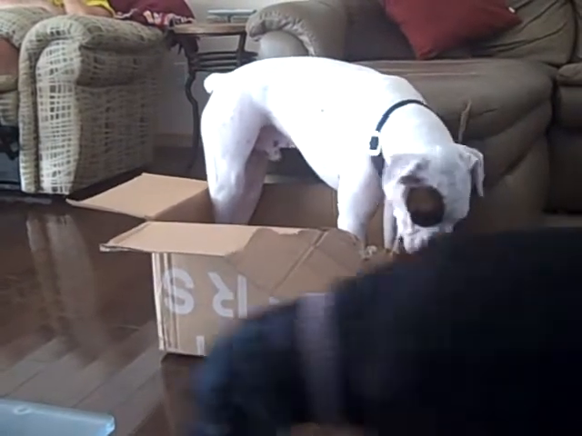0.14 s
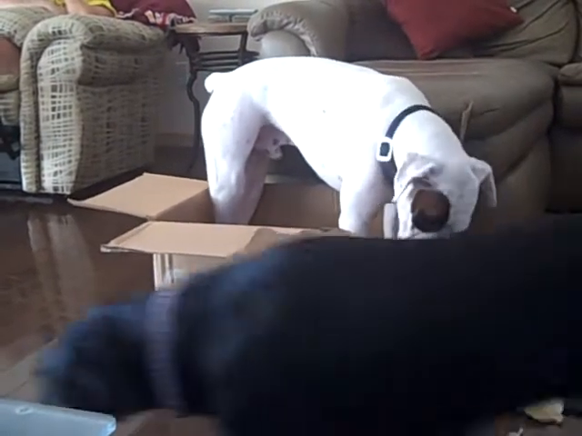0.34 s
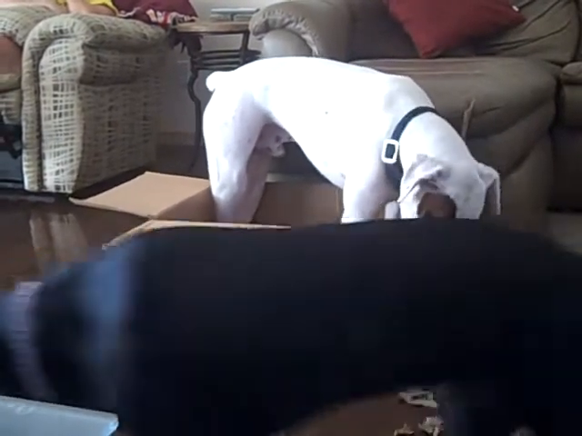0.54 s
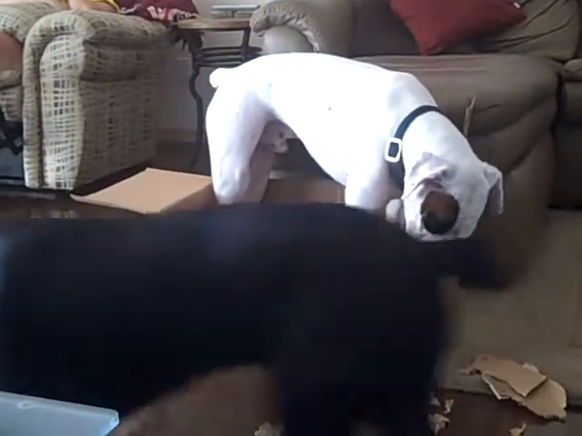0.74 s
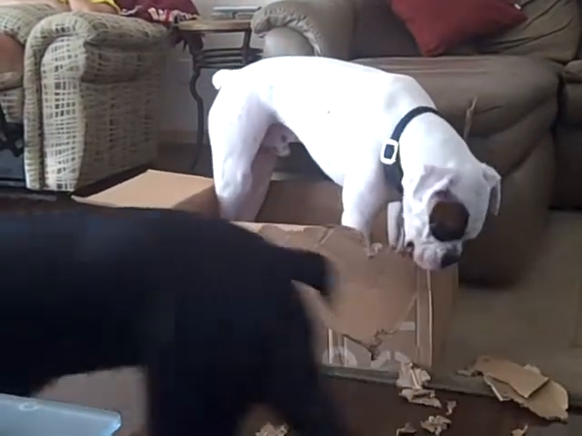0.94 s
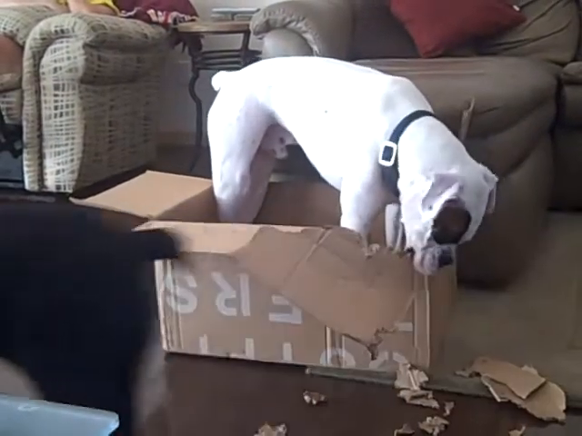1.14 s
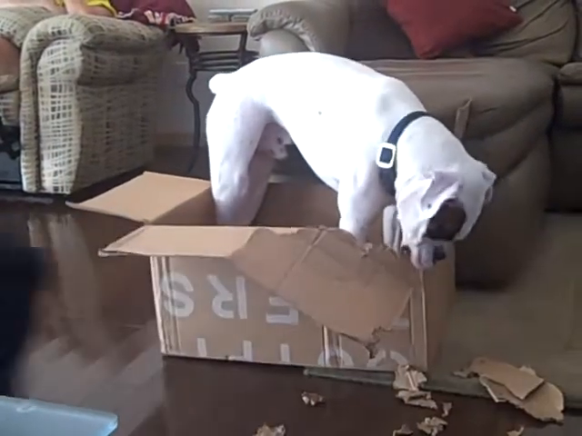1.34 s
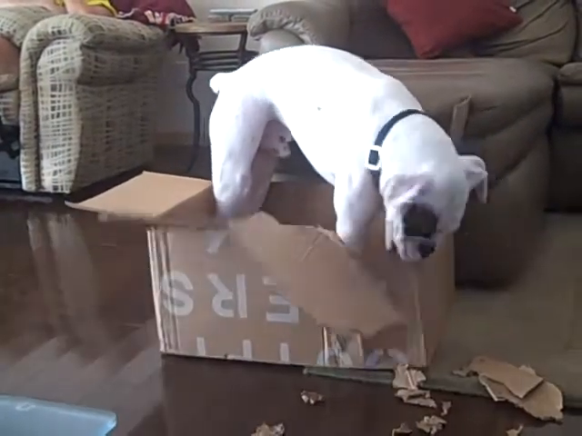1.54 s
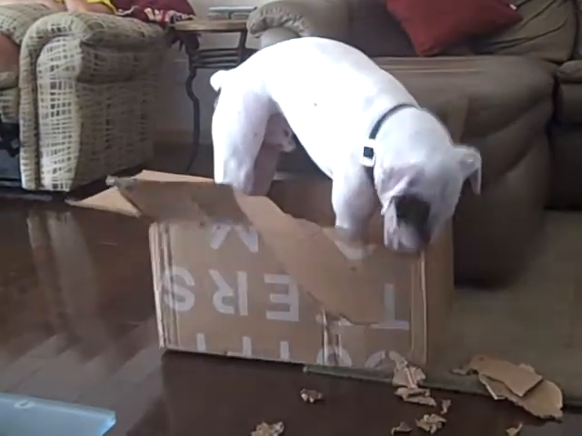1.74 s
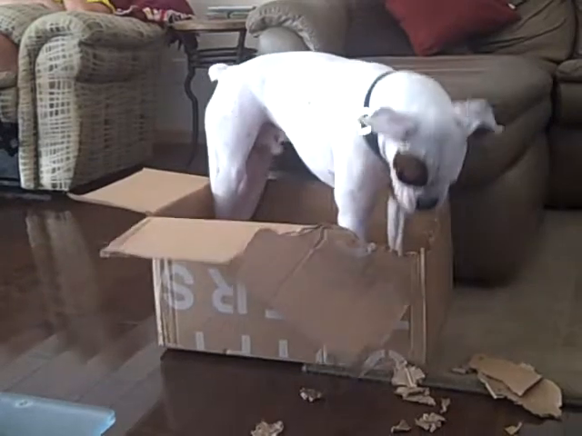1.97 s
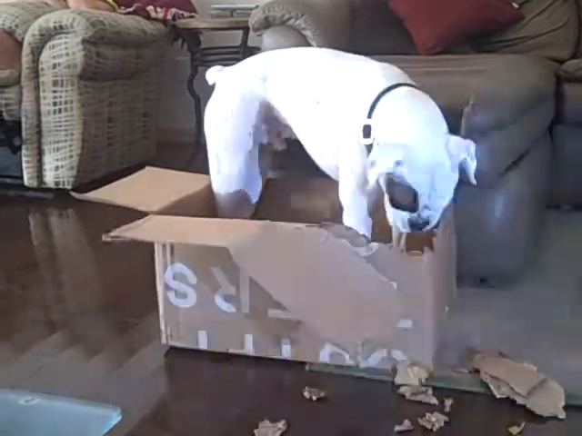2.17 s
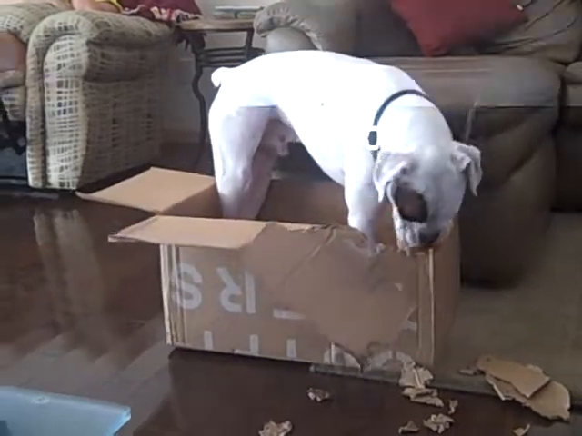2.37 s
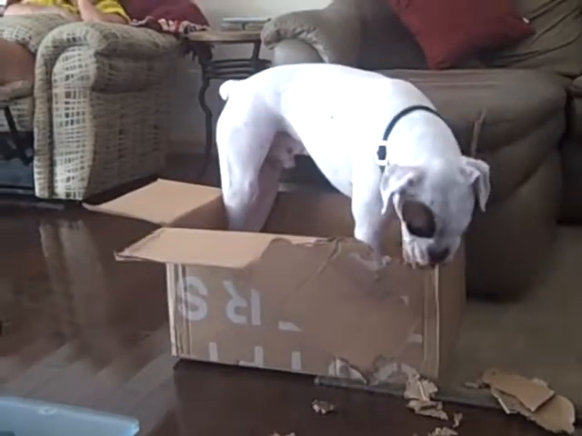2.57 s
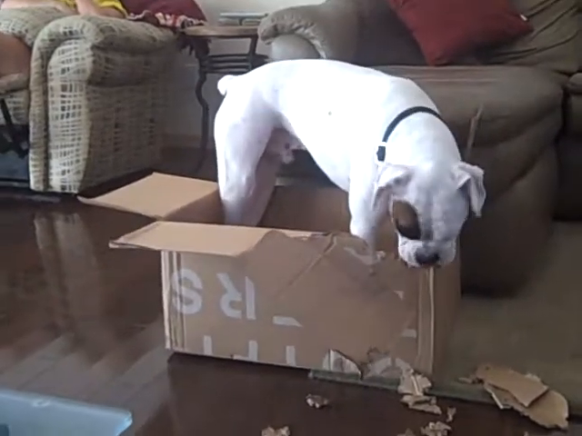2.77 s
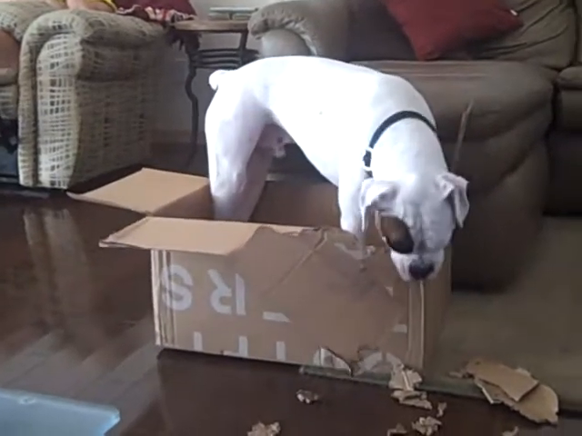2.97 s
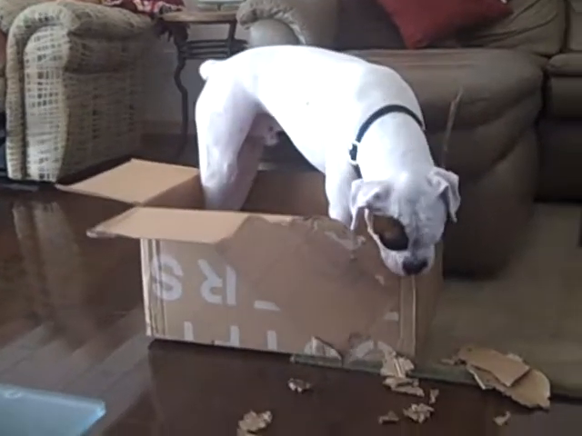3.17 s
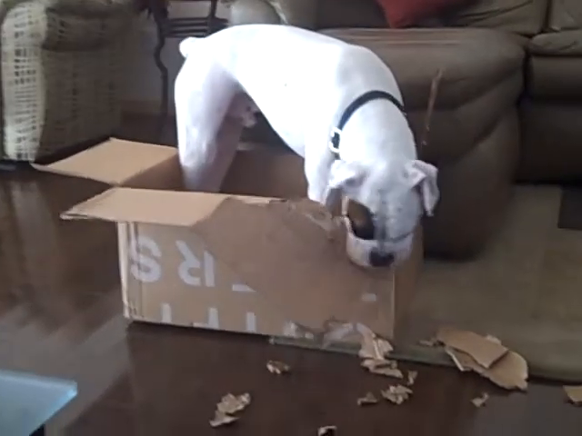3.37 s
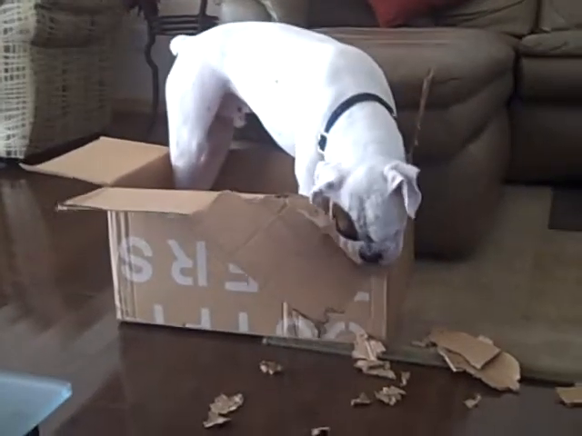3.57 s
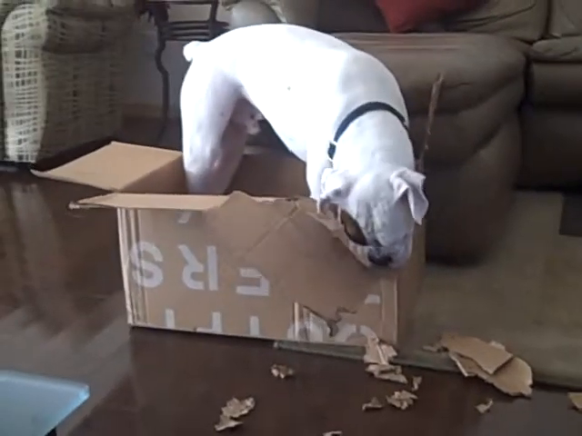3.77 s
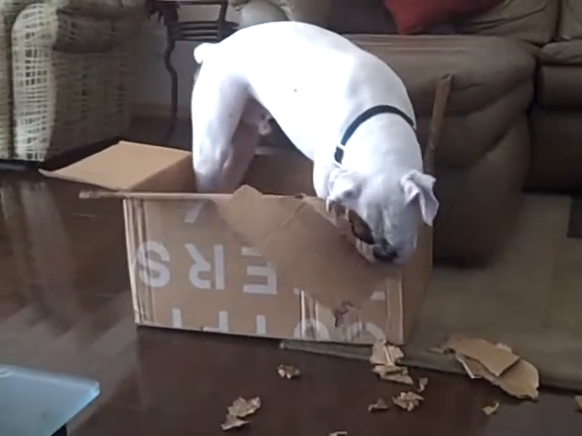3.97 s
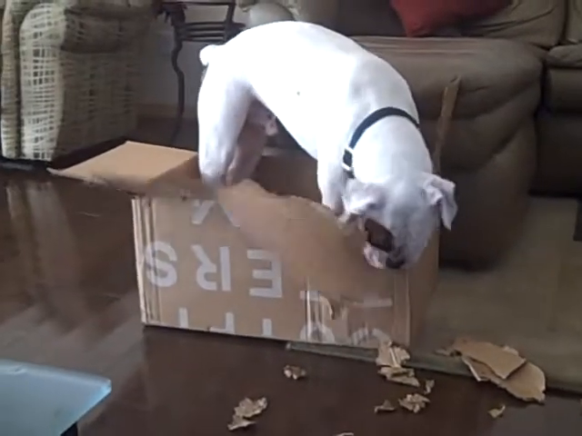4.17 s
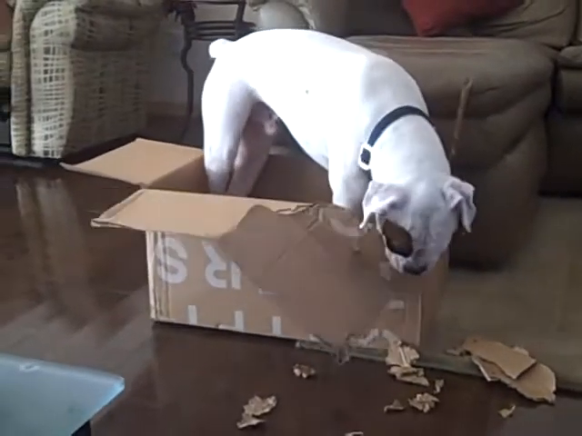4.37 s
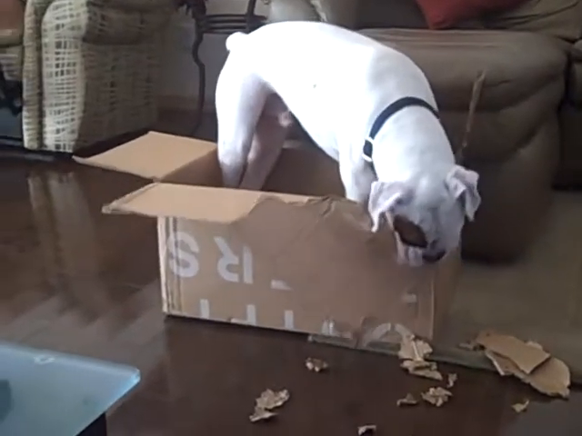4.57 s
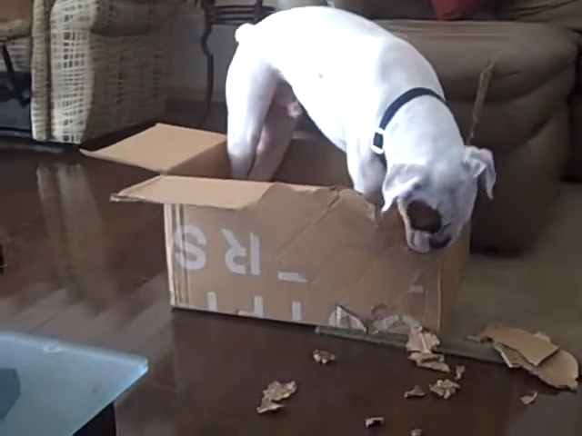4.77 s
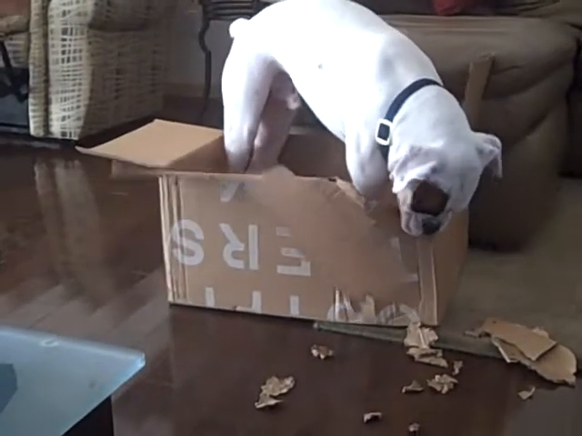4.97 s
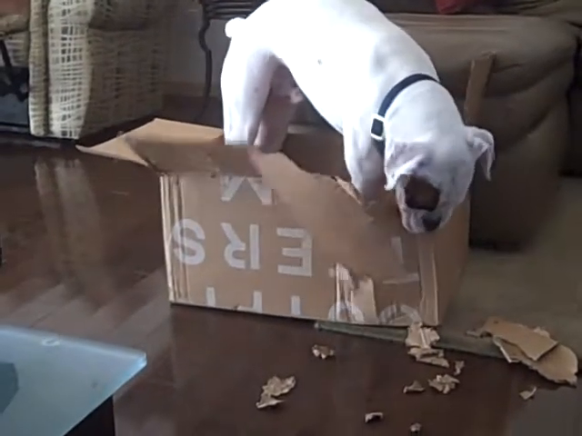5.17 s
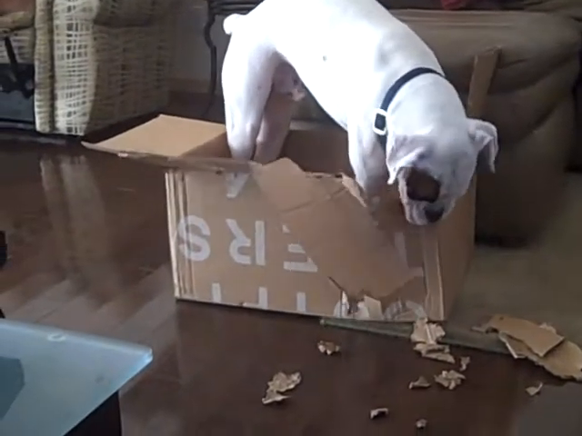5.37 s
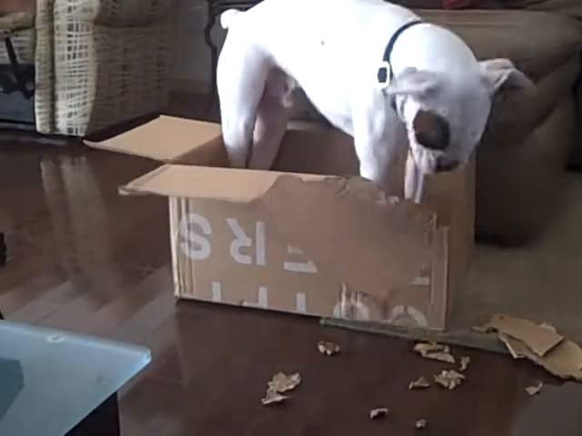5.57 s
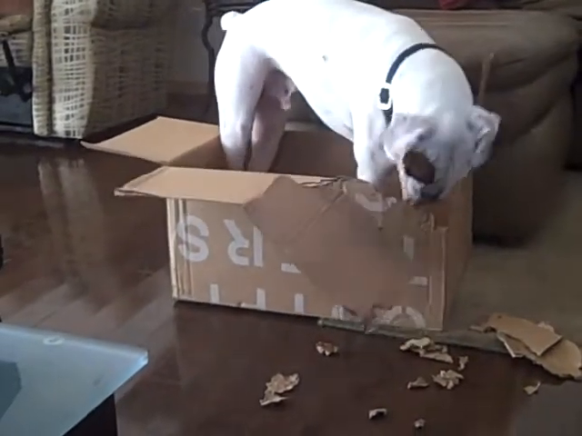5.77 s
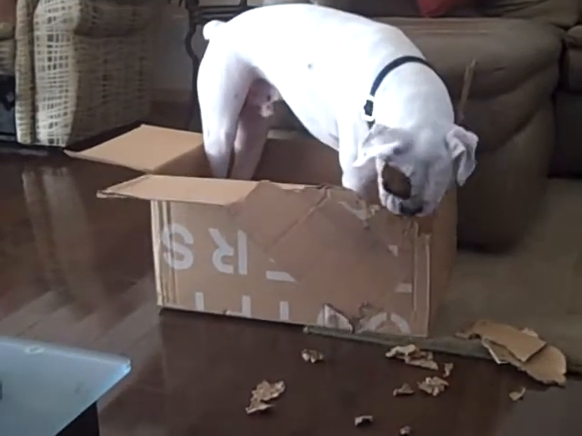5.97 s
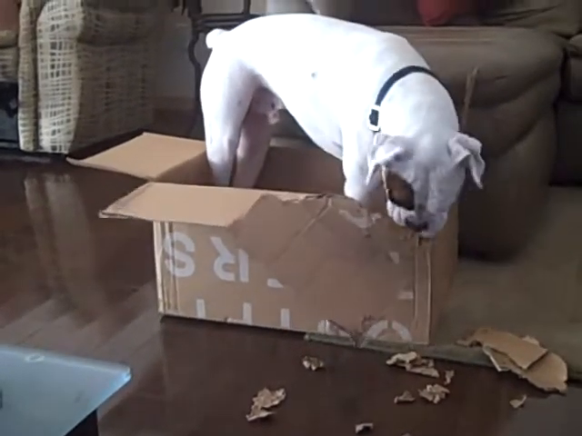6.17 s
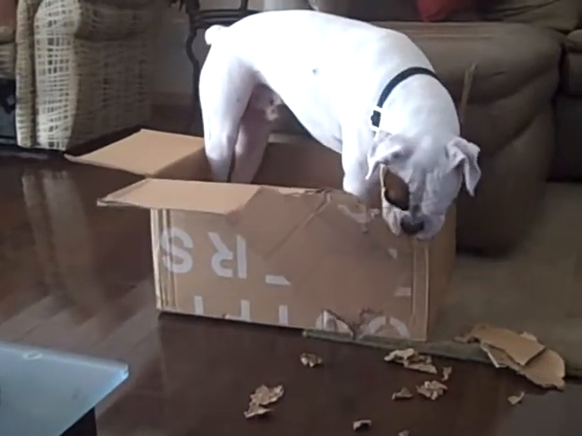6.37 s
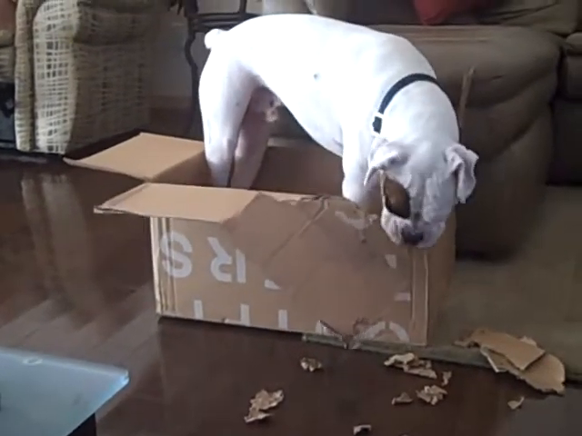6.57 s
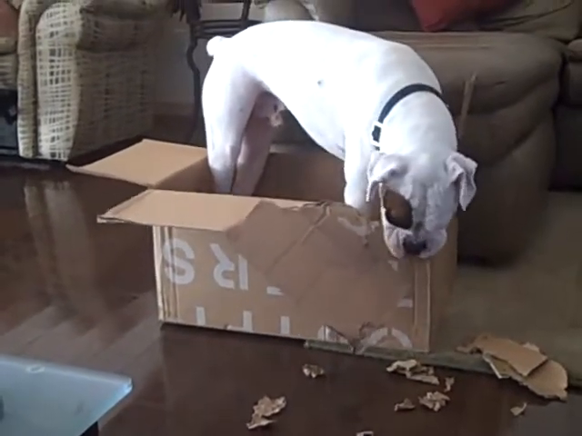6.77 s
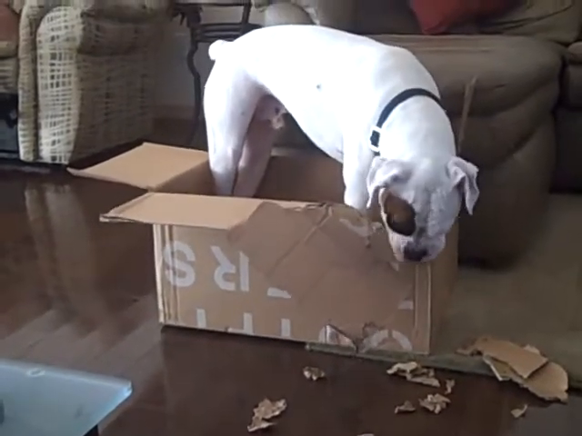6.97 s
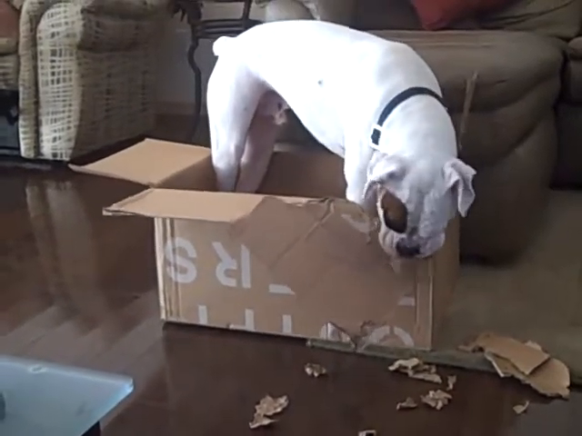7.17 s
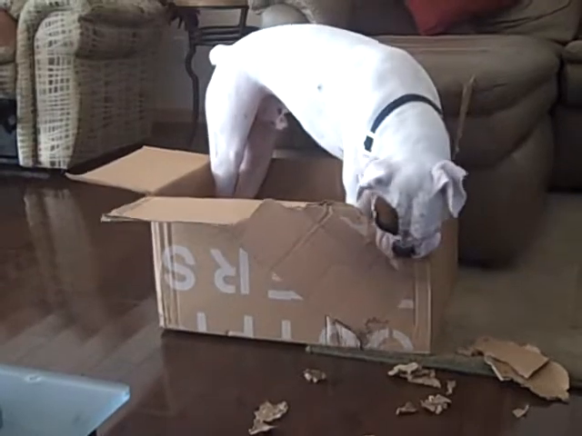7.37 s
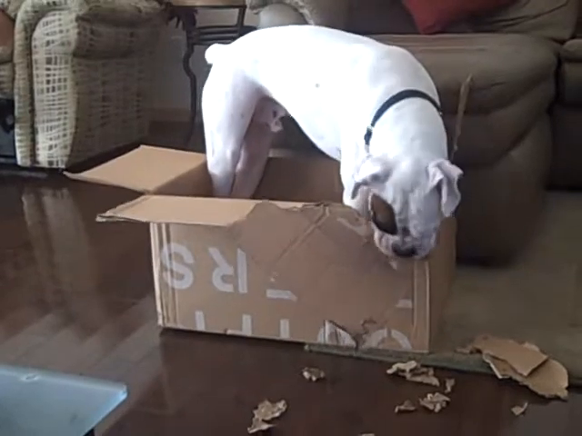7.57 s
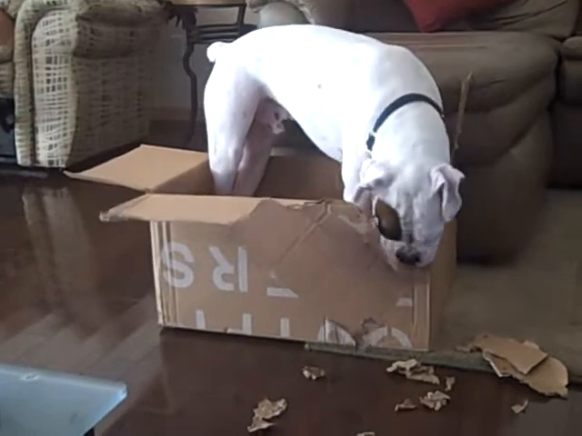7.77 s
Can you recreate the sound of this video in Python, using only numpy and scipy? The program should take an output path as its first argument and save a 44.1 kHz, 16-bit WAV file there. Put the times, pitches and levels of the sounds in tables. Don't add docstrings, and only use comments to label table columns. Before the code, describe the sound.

A dog gnaws and rips a cardboard box indoors, with sharp snaps, dry rustling, tooth clicks, short pants and one soft whimper.

```python
import sys
import numpy as np
from scipy import signal
from scipy.fft import rfft, irfft
from scipy.io import wavfile

SR = 44100
rng = np.random.default_rng(int(sys.argv[2]) if len(sys.argv) > 2 else 0)


def rack_gain(trim_db):
    fader = np.asarray(trim_db, float)
    return 10 ** (fader / 20)


def wav_out(sig):
    wavfile.write(sys.argv[1], SR, np.round(np.clip(np.atleast_2d(sig).T, -1, 1) * 32767).astype(np.int16))


N = 344641

# frequency in Hz, level in dB.
HUSH_SPECTRUM = [(12, -34), (20, 3.5), (70, -2.5), (301, -2), (513, 0.5), (718, -13), (1090, -4.5),
                 (2530, -14), (4540, -10), (12800, -24), (16000, -31)]
# frequency in Hz, rms level in dB.
ELECTRONICS = [(12166, -94), (12468, -86), (12769, -92), (13308, -90)]
# frequency in Hz, t60 in seconds.
ROOM_DECAY = [(100, 0.08), (400, 0.42), (1500, 0.4), (4000, 0.47), (12000, 0.24)]
GAIN_DROPS_S = [
    1.7685,
    5.4290,
]

# frequency in Hz, level in dB, t60 in seconds.
WALL_MODES = [(121.3, -8, 0.17), (159.2, -1.5, 0.17), (202.2, 2.5, 0.14), (247.2, 2.5, 0.11),
              (306, 0.4, 0.08), (424, -2, 0.096)]
# frequency in Hz, width in Hz, level in dB.
PANEL_MODES = [(647, 470, 10), (687, 110, 9), (1150, 270, 6), (1500, 770, 2), (1850, 126, 1.5),
               (2660, 520, -3), (3950, 1100, 5)]
# frequency in Hz, level in dB.
SCUFF_SPECTRUM = [(260, -78), (450, -20.5), (649, -13.5), (875, -10.5), (1730, -10), (2380, -8),
                  (4500, -26), (5850, -65), (9900, -120)]

# time in seconds, peak in dB.
PAW_PUSHES = [(0.415, -56), (0.71, -55), (2.68, -61), (3.535, -48), (4, -50), (6.7, -60), (5.185, -49),
              (3.24, -51), (4.628, -51), (5.1, -56), (5.465, -33), (5.565, -39.5), (7.225, -43),
              (6.821, -49), (1.8, -40)]
# start in seconds, length in seconds, starting pitch in Hz, sag in Hz per second,
# level in dB.
WHIMPER_SWELLS = [
    (6.94, 0.14, 430, 220, -56),
    (7.066, 0.059, 405, 60, -58),
    (7.159, 0.22, 412.5, 20, -58.5),
    (7.407, 0.08, 415, 5, -62.5),
]
# start in seconds, end in seconds, level in dB.
NOSE_BREATHS = [
    (2.95, 3.13, -67.5),
    (6.613, 7.003, -68),
]
# start in seconds, length in seconds, hiss at the teeth in dB,
# throat huff in dB.
PANTS = [
    (2.173, 0.25, -59.5, -62.5),
    (2.372, 0.12, -55.5, -61.5),
    (2.495, 0.3, -59, -53),
    (2.914, 0.11, -64, -65),
    (3.05, 0.12, -66, -67),
    (5.834, 0.15, -56.5, -58),
    (5.995, 0.33, -57.5, -64.5),
    (6.225, 0.16, -72, -49.5),
]
# time in seconds, pitch at the teeth in Hz, second throat resonance in Hz.
JAW_PATH = [(2.2, 5440, 1331), (2.33, 5640, 1420), (2.41, 5450, 1408), (2.49, 5370, 1560),
            (2.555, 6250, 1427), (2.62, 6330, 1382), (2.8, 6100, 1380), (2.93, 5620, 1590),
            (3.1, 5890, 1500), (5.84, 5270, 1487), (5.95, 5630, 1480), (6.02, 5650, 1400),
            (6.19, 5910, 1378), (6.25, 5705, 1400), (6.31, 5250, 1850), (6.38, 5240, 1746)]
# multiple of the second resonance, width in Hz, level in dB.
THROAT_BANDS = [(1, 170, 1), (1.75, 374, -2.3), (2.35, 500, -15)]
# multiple of the pitch at the teeth, width in Hz, level in dB.
GAP_BANDS = [(1, 400, 1), (1.25, 450, -7.5), (1.75, 500, -7.5), (2.25, 500, -7.5)]

# time in seconds, pressure of jaws and paws in dB, share tearing the paper skin in dB.
GNAWING = [(0.0, -54, -0.5), (0.41, -64.5, -1), (0.89, -55.5, -8), (1.07, -74, 8.5), (1.3, -60, 6.5),
           (1.5, -52.5, 5.5), (1.67, -55.5, -0.5), (2.3, -59, 3.5), (2.59, -59.5, -4), (3.0, -59.5, 0),
           (3.3, -56, -3.5), (4.02, -57, 6), (4.48, -58, -3), (4.85, -52, 2), (5.4, -52.5, -0.5),
           (6.2, -64, 3), (6.55, -57.5, -3.5), (7.81, -51.5, -7)]
# start in seconds, length in seconds, level in dB,
# pitch in Hz.
CREAKS_AND_WHISTLES = [(0.75, 0.11, -64, 3000), (1.12, 0.12, -55, 3700), (1.13, 0.15, -55.5, 1600),
                       (1.204, 0.061, -57, 4000), (1.208, 0.076, -60, 1150), (2.72, 0.12, -63.5, 2900),
                       (3.438, 0.03, -58, 1800), (4.386, 0.043, -49.5, 1330), (4.39, 0.032, -53, 2050),
                       (4.85, 0.02, -59, 6500), (6.15, 0.063, -64, 2800), (6.623, 0.067, -65, 10000),
                       (7.54, 0.016, -49, 750), (5.8, 0.06, -56, 3240), (6.3, 0.05, -52, 2500),
                       (2.53, 0.1, -56, 2500), (2.7, 0.03, -59.5, 930), (2.55, 0.056, -55.5, 640),
                       (6.64, 0.099, -66, 3200), (6.97, 0.058, -59, 2070), (4.62, 0.08, -51, 2700),
                       (2.4, 0.05, -66, 14700), (2.45, 0.03, -61, 9200), (2.51, 0.04, -64, 8700),
                       (2.64, 0.045, -64, 15000), (2.65, 0.03, -66, 10800), (5.7, 0.079, -61, 6100),
                       (5.72, 0.05, -69, 11700), (3.08, 0.05, -64, 6000), (7.62, 0.1, -50, 680),
                       (5.47, 0.05, -41, 1220), (1.77, 0.038, -38, 403), (7.72, 0.043, -49, 1760)]

# time in seconds, peak
# in dB, pitch in Hz.
HARD_CLICKS = [(2.225, -50, 8000), (2.267, -42, 6420), (2.392, -42, 7600), (2.411, -35, 5440),
               (2.557, -36.5, 6150), (2.743, -40, 5870), (2.933, -45, 5000), (3.2308, -35.5, 1750),
               (3.344, -45.5, 615), (4.191, -33.5, 1500), (4.5363, -32.5, 1370), (5.7117, -30, 1200),
               (5.838, -36.5, 5350), (6.257, -36, 3270), (6.378, -49, 8000), (6.468, -45.5, 2400),
               (7.0807, -43, 1950),
               (0.1307, -46, 2860), (0.3253, -55, 1810), (0.468, -41.5, 3850), (0.485, -45, 1530),
               (2.1756, -48, 1230), (2.4335, -45.5, 1440), (2.5133, -46, 1740), (3.3673, -50, 2580),
               (3.4531, -43, 1830), (3.734, -44, 1340), (3.7964, -48, 1440), (4.3307, -45, 1980),
               (4.4053, -38, 1240), (4.5676, -35, 1920), (5.0031, -40, 1890), (5.057, -42, 2100),
               (5.1866, -36, 1380), (7.576, -25.5, 2284),
               (0.5867, -62, 710), (0.6311, -55, 624), (0.6964, -49, 730), (1.087, -37, 1130),
                (1.2786, -55, 1100), (1.9321, -40.5, 710), (2.8615, -54, 650), (3.0351, -41.5, 645),
                (3.2326, -44.5, 650), (3.9839, -49, 680), (4.6439, -33, 810), (6.7462, -47.5, 690),
                (7.5588, -20.5, 670),
               (0.1297, -47, 7410), (0.3248, -50, 4910), (0.3896, -49, 6910), (0.5353, -56, 7110),
               (0.7533, -39, 4570), (0.9798, -54, 13700), (1.6857, -50, 13370), (2.4205, -43, 5580),
               (2.4724, -43, 5340), (2.7223, -47, 6350), (3.2252, -49, 14100), (3.6587, -43, 12940),
               (4.331, -47, 4690), (4.7417, -50, 13740), (4.8934, -42, 8960), (4.9487, -41, 10210),
               (5.0051, -38, 10640), (5.4371, -22, 9780), (5.6437, -46, 9300), (5.7105, -40, 9910),
               (6.5381, -51, 4970), (6.5845, -47, 5150), (7.1048, -52, 6400), (7.5577, -27.5, 5200)]
# time in seconds, peak in dB.
FIBRE_TICKS = [(0.066, -41), (0.0833, -35), (0.389, -49), (0.465, -40.5), (0.7787, -33.5), (1.0839, -24),
               (1.132, -33.5), (1.2161, -32.5), (1.44, -36), (1.7662, -11.5), (1.852, -28), (2.545, -43),
               (2.4576, -39), (2.5137, -41), (2.597, -35.5), (2.6374, -44), (0.898, -43.5), (3.4762, -25.5),
               (3.6542, -42), (4.191, -34.5), (4.5928, -28), (4.7104, -36), (5.3616, -40), (5.5169, -45),
               (6.195, -45), (6.7144, -42), (7.1724, -43), (7.194, -26.5), (7.5568, -28), (7.7952, -24.5)]
# time in seconds, peak in dB, t60 in seconds.
SKIN_SCRAPES = [(0.7348, -34, 0.028), (1.358, -42, 0.068), (1.406, -49, 0.026), (1.504, -34.5, 0.034),
                (1.7303, -34, 0.038), (1.7407, -30, 0.087), (3.698, -35.5, 0.042), (3.7304, -39, 0.031),
                (3.9524, -36.5, 0.099), (4.03, -40, 0.057), (4.085, -45, 0.028), (4.779, -30.5, 0.029),
                (4.826, -35.5, 0.022), (4.861, -36, 0.039), (4.9487, -47, 0.039), (4.983, -38, 0.061),
                (5.0549, -40, 0.029), (5.0812, -37, 0.066), (5.149, -34, 0.2), (5.172, -28, 0.051),
                (5.3785, -40, 0.042), (5.417, -29, 0.062), (5.427, -22, 0.046), (5.712, -39.5, 0.063),
                (6.644, -43, 0.091), (2.665, -46, 0.05), (6.8018, -32, 0.027), (7.3103, -39.5, 0.1)]

# time in seconds, peak in dB, pitch of the piece in Hz,
# wall thump in dB, share sent to the room in dB.
RIM_BITES = [(0.337, -47, 730, -55, 7), (0.628, -44.5, 635, -54, 7.5), (0.735, -27, 2700, -55, 2),
             (0.857, -36.5, 765, -50.5, 3.2), (1.023, -40, 1086, -51, 7), (1.085, -29.5, 1680, -46, 6.5),
             (1.778, -17, 653, -24, 1.5), (3.034, -40.5, 644, -46.5, 0), (3.229, -44, 1920, -49.5, -15),
             (3.343, -43.5, 636, -49, -13), (3.4764, -20.5, 695, -38.5, -5.5), (4.377, -40, 644, -52, 7),
             (4.536, -31.5, 650, -45.5, 1), (4.593, -17, 1700, -39.5, -5.5), (4.614, -19, 1500, -43.5, -6),
             (4.781, -28, 1950, -45.5, 3), (5.077, -43, 750, -50.5, 5.5), (5.509, -27, 1261, -34, -1.5),
             (6.534, -50, 610, -49.5, 5.5), (7.08, -32, 720, -46.5, -3), (7.197, -23.5, 675, -39, -1),
             (7.557, -25, 716, -43, 4.5), (7.574, -26.5, 1080, -43, -10), (7.763, -29.5, 623, -42.5, -1)]
# time in seconds, peak in dB, pitch of the piece in Hz,
# wall thump in dB, share sent to the room in dB.
BOARD_RIPS = [(0.083, -53.5, 810, -82, 17.5), (0.693, -50, 3000, -57, 9), (1.217, -44, 1150, -64, 10),
              (1.469, -43, 1520, -54.5, 13), (1.742, -25, 1780, -37, 2.5), (1.767, -19, 1070, -45, -1.5),
              (2.175, -51, 1180, -78, 3), (2.494, -47, 966, -79, 11), (3.508, -30.5, 1050, -47, 4.5),
              (3.697, -40.5, 703, -61.5, 1), (3.787, -46, 1950, -69, 0), (4.031, -48, 1450, -64, 2),
              (4.19, -33, 714, -51, 1), (4.984, -38.5, 770, -52.5, 6), (5.174, -36.5, 650, -49.5, 9),
              (5.428, -14.5, 663, -28, 0.5), (5.745, -49, 1297, -63, -13), (5.895, -44.5, 1445, -69, 7),
              (6.194, -41, 2640, -54.5, 4), (6.695, -50, 800, -57, 7), (6.802, -31.5, 590, -44, -0.5),
              (7.158, -38.5, 2040, -52.5, 7.5), (7.312, -38.5, 746, -55, 0.5), (7.797, -30, 1150, -43, 7.5)]
# time in seconds, peak in dB, pitch in Hz, share sent to the room in dB.
EDGE_NIBBLES = [(0.404, -42, 2350, 6), (0.426, -55, 1190, 13), (0.466, -50, 1000, 11),
                (2.987, -44.5, 2117, 5.5), (3.413, -42, 644, 2.5), (3.441, -38.5, 1800, 1),
                (4.396, -39.5, 1300, 3), (4.415, -38, 1150, -4), (0.155, -44.5, 1700, 4),
                (3.478, -23.5, 1770, -4), (4.5943, -27, 2250, -3), (5.43, -21, 1400, 1),
                (1.6, -41, 2500, -11), (4.567, -66, 1900, -7), (6.466, -61, 2310, 2.1),
                (6.566, -41.5, 720, -7), (6.586, -41.5, 2250, 1)]

HUSH_DB = -67.5
BITE_CRACK_DB, RIP_CRACK_DB, NIBBLE_CRACK_DB, NIBBLE_THUMP_DB = -31, -4, -40, -33
CRACK_GROWTH_DB_PER_DB, MIDDLING_DB = 0.94, -35
SETTLE_DB, SETTLE_RISE_S, SETTLE_FALL_S = -28, 0.037, 0.059


def rms_one(x):
    return x / np.sqrt(np.mean(x ** 2) + 1e-20)


def peak_one(x):
    return x / np.max(np.abs(x))


def impulse(size):
    return 1.0 * (np.arange(size) == 0)


def in_time(rows):
    s, *columns = np.transpose(rows)
    return [np.interp(np.arange(N) / SR, s, column) for column in columns]


def swell(start_s, length_s, peak=0.52):
    out = np.zeros(N)
    part = np.linspace(0, 1, round(length_s * SR))
    bend = np.log(0.5) / np.log(np.clip(peak, 0.1, 0.9))
    out[round(start_s * SR):][:len(part)] = np.abs(np.sin(np.pi * part ** bend))
    return out


def shaped(x, points):
    hz, db = np.transpose(points)
    freqs_hz = np.fft.rfftfreq(len(x), 1 / SR) + 1
    return irfft(rfft(x) * rack_gain(np.interp(np.log(freqs_hz), np.log(hz), db)), len(x))


def band(x, low_hz, high_hz):
    sos = signal.butter(2, [low_hz, min(high_hz, 19000)], "band", fs=SR, output="sos")
    return signal.sosfilt(sos, x)


def resonance(x, hz, width_hz):
    r = np.exp(-np.pi * width_hz / SR)
    poles = [1, -2 * r * np.cos(2 * np.pi * hz / SR), r * r]
    return signal.lfilter([(1 - r * r) / 2, 0, (r * r - 1) / 2], poles, x)


def moving_band(hz, width_hz):
    r = np.exp(-2 * np.pi * width_hz / SR)
    slow = signal.lfilter([1], [1, -2 * r, r * r], rng.standard_normal((2, N)))
    phase = 2 * np.pi * np.cumsum(hz) / SR
    return rms_one(slow[0] * np.sin(phase) + slow[1] * np.cos(phase))


def grains(per_s, spread_db, clump_db):
    clumps = rms_one(signal.lfilter([1], [1, -1.98, 0.9801], rng.standard_normal(N)))
    born = rng.random(N) < per_s * rack_gain(clump_db * clumps) / SR
    size = rack_gain(spread_db * np.minimum(rng.exponential(1, N), 5))
    return born * size * rng.choice([-1, 1], N)


def hush():
    return rack_gain(HUSH_DB) * rms_one(shaped(rng.standard_normal(N), HUSH_SPECTRUM))


def electronics():
    t = np.arange(N) / SR
    return sum(np.sqrt(2) * rack_gain(db) * np.sin(2 * np.pi * hz * t) for hz, db in ELECTRONICS)


def living_room(x):
    t = np.arange(SR) / SR
    hz, t60_s = np.transpose(ROOM_DECAY)
    edges_hz = 60 * 2 ** np.arange(0, 8.6, 0.5)
    echo = np.zeros(SR)
    for low, high in zip(edges_hz, edges_hz[1:]):
        decay_s = np.interp(np.log(low * high) / 2, np.log(hz), t60_s)
        echo += band(rng.standard_normal(SR), low, high) * rack_gain(-60 * t / decay_s)
    echo *= np.clip((t - 0.007) / 0.008, 0, 1)
    return signal.fftconvolve(x, echo / np.sqrt(np.sum(echo ** 2)))[:N]


def walls(push):
    return sum(rack_gain(db) * (-1) ** k * resonance(push, hz, np.log(1000) / np.pi / t60_s)
               for k, (hz, db, t60_s) in enumerate(WALL_MODES))


def panel(x):
    return x + sum(rack_gain(db) * resonance(x, hz, width_hz) for hz, width_hz, db in PANEL_MODES)


def paws():
    push_n = round(0.0051 * SR)
    push = np.zeros(8192)
    push[:push_n] = np.hanning(push_n)
    boom = peak_one(walls(np.gradient(push)))
    out = np.zeros(N)
    for s, db in PAW_PUSHES:
        out[round(s * SR):][:len(boom)] += rack_gain(db) * boom
    return out


def whimper():
    waver_hz, quaver_db = 4.0, 2
    t = np.arange(N) / SR
    tremble = rms_one(band(rng.standard_normal(N), 6.0, 23.0))
    waver = waver_hz * np.cumsum(tremble) / SR
    out = np.zeros(N)
    for s, length_s, hz, sag_hz_per_s, db in WHIMPER_SWELLS:
        cycles = (hz - sag_hz_per_s * (t - s) / 2) * (t - s) + waver
        level = np.sqrt(2) * rack_gain(db) * swell(s, length_s, 0.49) ** 1.1
        out += level * np.sin(2 * np.pi * cycles)
    return rack_gain(quaver_db * tremble) * out


def sniffs():
    t = np.arange(N) / SR
    level = sum(rack_gain(db) * np.clip(np.minimum(t - start, end - t) / 0.018, 0, 1)
                for start, end, db in NOSE_BREATHS)
    return level * moving_band(np.full(N, 3450.0), 340)


def teeth_hiss(hiss_hz):
    attack_s, fade_db, air_db = 0.0065, -5.5, -6
    t = np.arange(N) / SR
    level = np.zeros(N)
    for s, length_s, db, _ in PANTS:
        gate = np.clip(np.minimum(t - s, s + length_s - t) / attack_s, 0, 1)
        level += rack_gain(db + fade_db * np.clip((t - s) / length_s, 0, 1)) * gate
    hiss = sum(rack_gain(db) * moving_band(ratio * hiss_hz, width_hz) for ratio, width_hz, db in GAP_BANDS)
    hiss = hiss + rack_gain(air_db) * rms_one(band(rng.standard_normal(N), 4700, 16000))
    return rack_gain(-6.5) * level * hiss


def throat_huff(throat_hz):
    rasp_db = 3.5
    level = sum(rack_gain(db) * swell(s, length_s, 0.35) for s, length_s, _, db in PANTS)
    huff = sum(rack_gain(db) * moving_band(ratio * throat_hz, width_hz) for ratio, width_hz, db in THROAT_BANDS)
    huff = huff + moving_band(np.full(N, 740.0), 150)
    huff = huff + rack_gain(rasp_db) * rms_one(band(grains(2500.0, 3.0, 4.0), 770, 5300))
    return rack_gain(-7.0) * level * huff


def panting():
    hiss_hz, throat_hz = in_time(JAW_PATH)
    breath = throat_huff(throat_hz) + teeth_hiss(hiss_hz) + sniffs()
    puffs = rms_one(band(rng.standard_normal(N), 14.0, 51))
    return breath * rack_gain(1.8 * puffs)


def settling(column):
    power = np.full(N, 1e-18)
    for row in all_snaps():
        power[round(row[0] * SR)] += rack_gain(2 * row[column])
    slow = np.exp(-1 / SETTLE_FALL_S / SR)
    fast = np.exp(-(1 / SETTLE_FALL_S + 1 / SETTLE_RISE_S) / SR)
    return np.sqrt(signal.lfilter([0, slow - fast], np.convolve([1, -slow], [1, -fast]), power))


def patchy(x):
    depth_db = 2.1
    edges_hz = 1960 * 2 ** np.arange(0, 3.1, 0.5)
    hiss = band(x, 1850, 15800)
    out = hiss
    for k, (low, high) in enumerate(zip(edges_hz, edges_hz[1:])):
        pace = rms_one(band(np.roll(x, k * SR), 2.6, 22.0))
        out = out + (rack_gain(depth_db * np.tanh(pace / 2) * 2) - 1) * band(hiss, low, high)
    return rms_one(out)


def rustle():
    press_db, tear_db = in_time(GNAWING)
    after = rack_gain(SETTLE_DB) * settling(column=1)
    after_thump = rack_gain(-22) * settling(column=3)
    after_crack = rack_gain(-27.5) * settling(column=4)
    rub = grains(1500.0, 1.46, 5.0)
    rumble = np.hypot(rack_gain(-78.0), after_thump) * rms_one(walls(rub))
    scuff = np.hypot(rack_gain(press_db - 5.5), after) * rms_one(panel(shaped(rub, SCUFF_SPECTRUM)))
    hiss_level = np.hypot(rack_gain(press_db + tear_db - 7.5), rack_gain(-18) * after + after_crack)
    hiss = hiss_level * patchy(rub + grains(6000.0, 2.5, 3.9))
    lone = band(grains(250.0, 5.5, 5.0), 730, 8500)
    crackle = rack_gain(-7.5) * after * rms_one(panel(lone))
    return rumble + scuff + hiss + crackle


def creaks_and_whistles():
    width = 0.26
    rub = rms_one(grains(3000.0, 1.8, 3.3))
    out = np.zeros(N)
    for s, length_s, db, hz in CREAKS_AND_WHISTLES:
        part = slice(round(s * SR), round((s + length_s) * SR))
        ringing = resonance(resonance(rub[part], hz, width * hz), hz, 2 * width * hz)
        out[part] += rack_gain(db) * rms_one(ringing) * swell(s, length_s)[part]
    return out


def prickle():
    press_db, tear_db = in_time(GNAWING)
    return rack_gain(-20 + press_db + tear_db) * rms_one(band(grains(220.0, 3.5, 5.0), 3300, 14500))


def teeth():
    size = 1024
    click = impulse(size)
    edge = rack_gain(-12) * peak_one(band(click, 1500, 14000))
    out = np.zeros(N + size)
    for s, db, hz in HARD_CLICKS:
        ring = peak_one(resonance(resonance(click, hz, 0.14 * hz), hz, 0.79 * hz))
        body = rack_gain(-8.5) * peak_one(band(click, max(0.25 * hz, 480), hz))
        hit = rack_gain(-1.5) * ring + body + edge * min(hz / 1200, 1) ** 2
        out[round(s * SR):][:size] += rack_gain(db) * hit
    return out[:N]


def ticks():
    size, fibre_hz, fibre_t60_s, skin_hz = 4096, 4230, 0.032, 11400
    t = np.arange(size) / SR
    rows = [(s, db, fibre_hz, fibre_t60_s) for s, db in FIBRE_TICKS]
    rows += [(s, db, skin_hz, t60_s) for s, db, t60_s in SKIN_SCRAPES]
    out = np.zeros(N + size)
    for s, db, hz, t60_s in rows:
        noise = rng.standard_normal(size)
        fade = rack_gain(-60 * t / t60_s) * np.minimum(t / t60_s / 0.22, 1)
        middle = np.argmax(fade) // 2
        fade[middle] = 2.4 / abs(noise[middle])
        burst = noise * fade
        puff = peak_one(resonance(burst, hz, 0.5 * hz)) + 2.82 * peak_one(band(burst, 1800, 23700))
        out[round(s * SR):][:size] += rack_gain(db - 9.5) * puff
    return out[:N]


def all_snaps():
    def crack(db, share_db):
        return MIDDLING_DB + CRACK_GROWTH_DB_PER_DB * (db - MIDDLING_DB) + share_db
    bites = [(s, db, hz, thump_db, crack(db, BITE_CRACK_DB), room_db)
             for s, db, hz, thump_db, room_db in RIM_BITES]
    rips = [(s, db, hz, thump_db, crack(db, RIP_CRACK_DB), room_db)
            for s, db, hz, thump_db, room_db in BOARD_RIPS]
    nibbles = [(s, db, hz, db + NIBBLE_THUMP_DB, crack(db, NIBBLE_CRACK_DB), room_db)
               for s, db, hz, room_db in EDGE_NIBBLES]
    return bites + rips + nibbles


def snap(start, hz, thump_db, crack_db, db):
    bend, tear = start
    piece = 0.72 * peak_one(panel(band(band(bend, 425, 3930), 434, 5840)))
    piece = piece + peak_one(resonance(bend, hz, 0.23 * hz))
    piece = piece + 0.24 * peak_one(resonance(bend, 2.2 * hz, 1.3 * hz))
    crack = peak_one(band(tear, 1100, 25500))
    boom = peak_one(walls(tear + 4.5 * tear[0] * impulse(len(tear))))
    return rack_gain(db - 4.5) * piece + rack_gain(crack_db + 3.0) * crack + rack_gain(thump_db + 0.5) * boom


def snaps():
    size = 8192
    near, sent = np.zeros((2, N + size))
    t = np.arange(size) / SR
    click = np.tile(impulse(size), (2, 1))
    for s, db, hz, thump_db, crack_db, room_db in all_snaps():
        t60_s = 0.034 * rack_gain(0.12 * (db + 28.0))
        fade = rack_gain(-60 * t / t60_s) * np.minimum(t / t60_s / 0.024, 1)
        volley = rng.standard_normal((2, size)) * fade
        at = round(s * SR)
        near[at:at + size] += snap(volley + 3.0 * click, hz, thump_db, crack_db, db)
        around = snap(click + 0.061 * volley, hz, thump_db - 1.5, crack_db + 5.5, db + 2.0)
        sent[at:at + size] += rack_gain(room_db) * around
    return near[:N], sent[:N]


def scene():
    near, sent = snaps()
    clicks = teeth()
    soft = ticks() + paws() + rustle() + panting()
    room = living_room(rack_gain(-2.0) * sent + rack_gain(-7.0) * soft + rack_gain(-20) * clicks)
    dog = near + soft + clicks + whimper() + creaks_and_whistles() + prickle()
    return (dog + room + hush())[None]


def band_limit(x):
    return signal.sosfilt(signal.butter(12, 16660, fs=SR, output="sos"), x)


def record(dry):
    hold_s, pace_s, ramp_s, step_db = 0.359, 0.0337, 0.0015, 0.5
    offset, coupling_s, cutoff_hz = -0.089, 0.085, 16250
    t = np.arange(N) / SR
    steps = np.zeros(N)
    for s in GAIN_DROPS_S:
        steps -= 4 * np.clip((t - s) / ramp_s, 0, 1)
        for k in range(4):
            steps += np.clip((t - s - hold_s - pace_s * k) / ramp_s, 0, 1)
    gain = rack_gain(step_db * steps)
    r = np.exp(-1 / (coupling_s * SR))
    jolt = signal.lfilter([1, -1], [1, -r], offset * (gain - 1))
    mix = gain * dry + jolt + electronics() - 0.0004
    mix = signal.sosfilt(signal.cheby2(20, 50, cutoff_hz, fs=SR, output="sos"), mix)
    return band_limit(mix)


dry = scene()
out = record(dry)
wav_out(out)
```